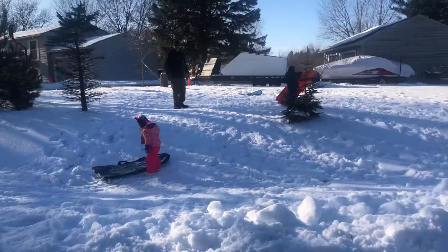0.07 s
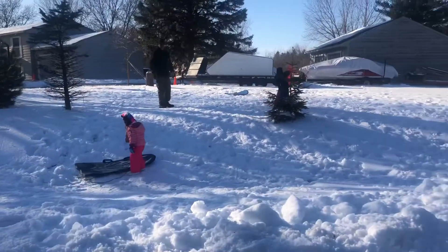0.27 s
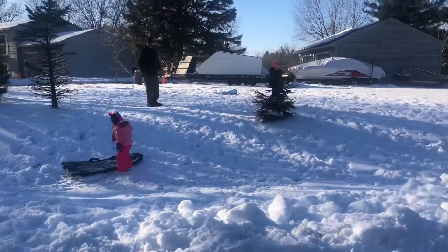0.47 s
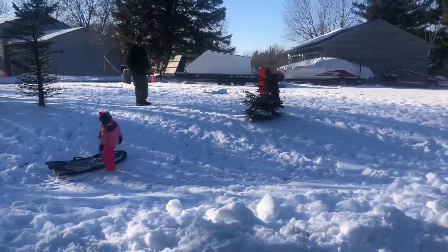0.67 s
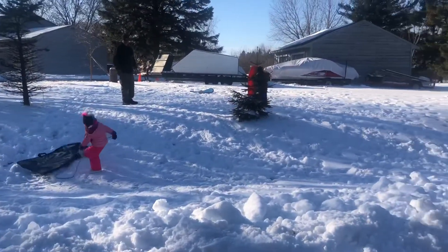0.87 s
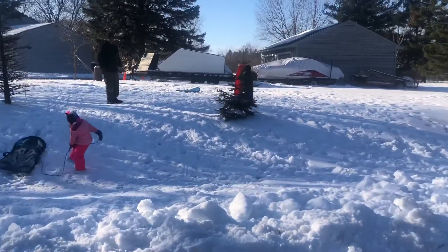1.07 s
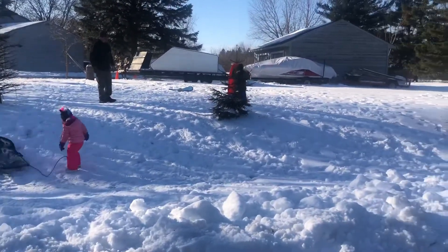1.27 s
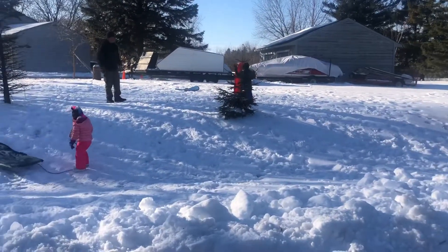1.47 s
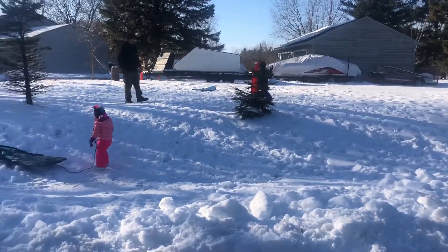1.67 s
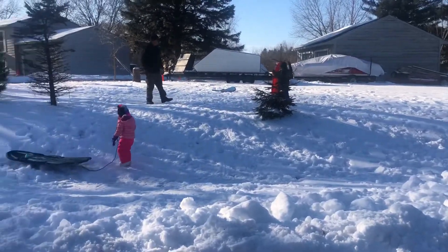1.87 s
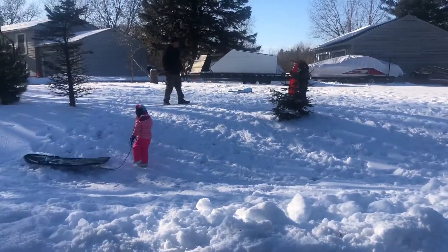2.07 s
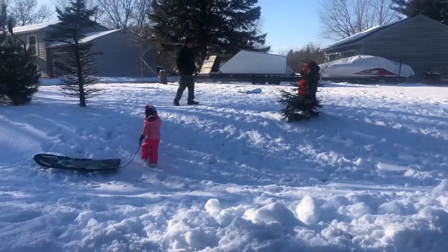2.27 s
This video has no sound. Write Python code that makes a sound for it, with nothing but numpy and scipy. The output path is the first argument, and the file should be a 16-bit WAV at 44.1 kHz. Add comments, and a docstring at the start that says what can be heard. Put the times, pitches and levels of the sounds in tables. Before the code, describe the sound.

Packed snow crunches and scrapes under a dragged plastic sled as low wind buffets the microphone.

```python
"""Snow crunches, cracks and scrapes as a plastic sled is dragged over it in the open.
The packed crust crunches in short bursts of tiny snapping crystals, single lumps crack with a
squeak, and the sled's hull scrapes on in between. Swirls of wind rumble and thump on a phone
microphone, over a faint outdoor hiss."""
import sys
import numpy as np
from scipy import signal
from scipy.fft import rfft, irfft, next_fast_len
from scipy.io import wavfile
from scipy.ndimage import uniform_filter1d

SR = 44100
rng = np.random.default_rng(int(sys.argv[2]) if len(sys.argv) > 2 else 0)


def master(y):
    """Save y as 16-bit WAV."""
    cut = np.clip(np.atleast_2d(y).T, -1, 1)
    pcm = np.round(cut * 32767)  # scale
    wavfile.write(sys.argv[1], SR, pcm.astype(np.int16))


N = 102841
T = np.arange(N) / SR

# Tone of the crust: f/Hz, level/dB
CRUST_TONE = [(350, 34), (600, 18), (1180, 9.5), (1420, 8.5), (2640, 4.5), (3700, 2), (5180, -1),
              (6000, 0.5), (15000, -17)]
# Bursts of crunching: t/s, length/s, then one level/dB for each band in bands_hz
CRUNCHES = [(.008, 0.0076, -50, -68, -64, -45), (0.078, 0.024, -55, -47, -59, -53),
            (0.102, 0.048, -65, -51, -58.5, -59.5), (0.227, 0.017, -85, -47.5, -66, -47),
            (0.538, 0.006, -51, -61, -55, -63), (0.552, 0.015, -64, -53, -49, -59),
            (.565, 0.0083, -50, -41, -49, -52), (0.577, 0.022, -53, -32.5, -42.5, -47),
            (0.611, 0.059, -62.5, -53.5, -56.5, -77), (0.697, 0.037, -61, -59, -52.5, -66),
            (0.804, 0.012, -40.5, -42.5, -48, -56), (0.972, 0.027, -49, -40.5, -51, -52.5),
            (1.098, 0.022, -53.5, -46.5, -56.5, -67), (1.137, 0.025, -50, -47, -56, -57),
            (1.171, 0.016, -47.5, -45.5, -50, -71), (1.198, 0.011, -60, -61, -61, -66),
            (1.228, 0.019, -50, -46.5, -40.5, -50.5), (1.336, 0.045, -46.5, -46, -50, -57.5),
            (1.366, 0.0048, -55, -49, -59, -43), (1.389, 0.0086, -54, -70, -50, -69),
            (1.417, 0.021, -48, -49, -51.5, -59), (1.47, 0.0078, -49, -77, -47.5, -68),
            (1.526, 0.024, -50.5, -71, -67.5, -76), (1.678, 0.098, -50.5, -80, -70, -69),
            (1.792, 0.063, -52.5, -52, -57.5, -70), (1.92, 0.028, -52.5, -55, -45.5, -61),
            (1.937, 0.045, -52, -60, -49.5, -55), (2.01, 0.024, -54, -55, -64, -67),
            (2.047, 0.012, -50.5, -76, -67, -72), (2.088, 0.0074, -44, -76, -56, -74),
            (2.111, 0.048, -80, -52, -61, -68), (2.156, 0.0076, -54, -55, -50, -75),
            (2.185, 0.005, -71, -52, -59, -81), (2.232, 0.0082, -61, -55, -63, -75),
            (2.315, 0.01, -42, -43, -40.5, -46.5)]
def crunches(attack_s=.001, release_s=.005):
    """The crust gives way in bursts of snapping crystals that start fast, hold and die away."""
    bands_hz = [(2200, 3900), (750, 2200), (3900, 9000), (9000, 17000)]
    crystals = grains(per_s=9000) * undb(1.5 * np.clip(wander(per_s=250), -2, 2))
    bands = [colour(crystals, CRUST_TONE, *edges) for edges in bands_hz]
    bands = [band * undb(2.2 * wander(per_s=250)) for band in bands]  # each flickers on its own
    out = np.zeros(N)
    for start, length, *levels_db in CRUNCHES:
        rise = np.clip((T - start) / attack_s, 0, 1)
        fade = np.exp(-np.maximum(T - start - length, 0) / release_s)
        out += rise * fade * sum(undb(db) * band for db, band in zip(levels_db, bands))
    return out


# Lumps that break: t/s, ring level/dB, ring f/Hz, click level/dB relative to the ring
CRACKS = [(0.0157, -34.5, 1730, -18), (0.111, -32, 1740, -13), (0.1228, -27.5, 1740, -7),
          (0.1358, -30.5, 1750, -16), (0.229, -26, 6230, 2.5), (0.2765, -44.5, 1360, 8),
          (0.538, -31.5, 4440, 0.5), (0.5861, -21, 1395, -9), (0.6301, -34.5, 4500, -4),
          (0.643, -35, 4200, -5), (0.6599, -44, 4200, 6), (0.7218, -34.5, 4400, -4),
          (0.7335, -50, 4500, -7), (0.8098, -17.5, 2580, -9.5), (0.834, -27, 2700, -10),
          (0.8474, -50, 2240, 1), (0.9218, -31.5, 2000, -8), (0.9973, -20.5, 2420, -24),
          (1.1417, -17, 2650, -13), (1.154, -22.5, 2500, -10), (1.3175, -32.5, 5200, -2),
          (1.3312, -32, 2600, -2), (1.3675, -29.5, 2740, 3), (1.391, -24, 3380, -8), (1.406, -30, 2920, -4),
          (1.4636, -29, 3160, -8), (1.483, -26, 3300, -16), (1.4716, -34, 2680, 1.5),
          (1.5013, -25.5, 2650, -9), (1.5385, -45, 2880, -2), (1.6197, -38.5, 1330, 2),
          (1.6415, -29.5, 2050, -8.5), (1.6726, -37, 2620, -7), (1.708, -34.5, 2600, -2),
          (1.7195, -45, 2600, -5), (1.7291, -41, 2470, 14), (1.7509, -34.5, 2570, 8.5),
          (1.8397, -32.5, 1980, -5), (1.905, -49, 3020, 6), (1.9335, -30, 2780, 5), (2.0074, -47, 5800, 5),
          (2.0902, -28, 3100, -14), (2.0988, -41, 2950, -8), (2.1595, -39, 2730, -2),
          (2.2129, -29.5, 2970, 1), (2.2452, -32.5, 2630, -8.5), (2.3006, -29, 2420, -5),
          (2.3134, -22.5, 2150, -8), (2.319, -22, 810, -27)]
def cracks(splinter_s=.0022, splinter_db=-7, click_rise_s=.0003, click_fade_s=.009):
    """A lump snaps with a bright click and a squeak, then splinters again, a little off pitch."""
    out, t = np.zeros(N + 2048), T[:1024]
    bright = signal.butter(2, [1000, 10500], "band", fs=SR, output="sos")
    clicks = signal.sosfilt(bright, rng.standard_normal((64, len(t))))
    clicks *= np.minimum(t / click_rise_s, 1) * 1000. ** (-t / click_fade_s)
    chances = rng.random((64, 2))
    for (start, db, hz, click_db), click, (wait, detune) in zip(CRACKS, clicks, chances):
        since_splinter = np.maximum(t - splinter_s * (1 + wait) / 2, 0)
        splinter = undb(splinter_db) * ring(since_splinter * hz * (.92 + .16 * detune))
        i = int(start * SR)
        out[i:i + len(t)] += undb(db) * (ring(t * hz) + splinter + undb(click_db) * click)
    return out[:N]


def ring(cycles, rise_cycles=1.3, fade_cycles=13):
    """A broken lump rings briefly: a tone that swells, then drops 60 dB over fade_cycles."""
    fade = 1000. ** (-np.maximum(cycles - rise_cycles, 0) / fade_cycles)
    return np.sin(2 * np.pi * cycles) * np.minimum(cycles / rise_cycles, 1) * fade


# Tone of the sliding hull: f/Hz, level/dB
SCRAPE_TONE = [(240, -10), (400, -7.5), (645, 8.5), (979, 4), (2020, 1.5), (2670, 3), (3640, 1), (4700, -2),
               (6500, -2.5), (8000, -10), (11900, -20), (16000, -52)]
# How loudly the hull scrapes: t/s, level/dB
SCRAPE_LEVELS = [(0.0, -47.5), (0.1, -57), (0.3, -56.5), (0.56, -59), (0.7, -48.5), (0.76, -48.5),
                 (0.93, -48.5), (1.05, -59), (1.15, -54), (1.2, -59.5), (1.3, -58), (1.45, -45),
                 (1.56, -54), (1.63, -50.5), (1.74, -50.5), (1.86, -57), (2.0, -52.5), (2.33, -51.5)]
def scrape(grit_per_s=55, grit_fade_s=.016):
    """The hull slides over uneven grains; bits of grit tick, and a powdery fizz follows along."""
    when, chance = rng.random((400, 2))[:int(grit_per_s * N / SR)].T
    ticks = np.zeros(N)
    ticks[(when * N).astype(int)] = undb(2 + np.minimum(-3.5 * np.log(chance + 1e-9), 7))
    grit = 1 + signal.lfilter([1], [1, -1000. ** (-1 / (grit_fade_s * SR))], ticks)
    rubbing = grains(per_s=6000) * undb(2 * wander(per_s=60)) * grit
    level_db = curve(SCRAPE_LEVELS, column=1)
    powder = colour(rng.standard_normal(N) * np.sqrt(grit), HISS_TONE, lo_hz=5300)
    powder_db = -64.5 + .82 * (level_db + 55.5)  # rises and falls a little less than the scrape
    return colour(rubbing, SCRAPE_TONE) * undb(level_db) + powder * undb(powder_db)


# Tone of the wind: f/Hz, level/dB
RUMBLE_TONE = [(20, -60), (33, -10), (64, 4.5), (92, 5), (191, -7.5), (293, -14), (546, -28.5),
               (675, -34.5), (892, -49), (1100, -92)]
# Gusts, before the microphone rounds them off: t/s, low rumble level/dB, upper rumble level/dB
GUSTS = [(0.0, -24.5, -40.5), (0.02, -37, -26), (0.05, -36.5, -43.5), (0.18, -24, -23.5),
         (0.23, -31.5, -31.5), (0.3, -26, -27), (0.37, -33, -48.5), (0.47, -35.5, -47),
         (0.52, -28.5, -42.5), (0.56, -33.5, -50), (0.6, -33, -28.5), (0.76, -26.5, -31.5),
         (0.78, -35, -22), (0.8, -34, -39), (0.84, -24, -30), (0.88, -27, -38), (0.92, -23, -28),
         (1.09, -30.5, -37), (1.17, -40, -21), (1.19, -40, -52), (1.21, -22.5, -46), (1.23, -20.5, -21),
         (1.265, -30, -51), (1.3, -57, -51), (1.36, -56, -45.5), (1.41, -35.5, -44), (1.52, -37, -48),
         (1.54, -50, -50), (1.62, -25, -38), (1.67, -41.5, -46.5), (1.69, -40, -43.5), (1.76, -30.5, -48),
         (1.89, -40.5, -50.5), (1.94, -29, -38), (2.03, -40, -50), (2.3, -50, -53.5), (2.33, -74, -39)]
def wind(split_hz=159, flutter_db=7, limit=.24):
    """Swirling air rumbles and thumps on the microphone, which rounds off the strongest swings."""
    flutter = undb(flutter_db * wander(per_s=77))
    noise = rng.standard_normal(N)
    low = even_out(colour(noise, RUMBLE_TONE, hi_hz=split_hz))
    upper = even_out(colour(noise * flutter, RUMBLE_TONE, lo_hz=split_hz))
    rumble = low * undb(curve(GUSTS, column=1)) + upper * undb(curve(GUSTS, column=2))
    return limit * np.tanh((rumble + thumps()) / limit)


# Thumps of wind, before the microphone rounds them off: t/s, level/dB, starting f/Hz
THUMPS = [(0.155, -26, 260), (0.17, -6, 196), (0.277, -19, 312), (.295, -7, 294), (0.521, -20, 257),
          (0.609, -14, 211), (0.666, -14, 247), (0.687, -10.5, 270), (0.763, -16.5, 360), (0.775, -15, 203),
          (0.827, -11.5, 373), (1.163, -16.5, 324), (1.22, -4, 248), (1.608, -16, 152)]
def thumps(fade_cycles=.63, sag=.19):
    """A swirl of air hits the microphone: a very short, low tone whose pitch sags."""
    out = np.zeros(N)
    for start, db, hz in THUMPS:
        cycles = np.maximum(T - start, 0) * hz
        slowing_cycles = np.log(1 + sag * cycles) / sag
        swell = np.minimum(cycles, 1) * np.exp(1 - np.maximum(cycles / fade_cycles, 1))
        out += undb(db) * np.sin(2 * np.pi * slowing_cycles) * swell
    return out


# Tone of the outdoor hiss (the powdery fizz uses its treble too): f/Hz, level/dB
HISS_TONE = [(433, -28), (656, -18), (1250, -15), (6300, -28.5), (14500, -30), (16000, -33.5)]
def hiss(level_db=-69):
    """The open air hisses faintly and steadily."""
    return colour(rng.standard_normal(N), HISS_TONE) * undb(level_db)


def grains(per_s, spread_db=2.5, ring_cycles=8, sizzle_db=-8):
    """Snow crystals snap at random, each ringing briefly at one of 32 pitches, over a fine sizzle."""
    when, pitch, chance = rng.random((40000, 3))[:int(per_s * N / SR)].T
    sizes = undb(spread_db * np.minimum(-np.log(chance + 1e-9), 3))
    snaps, rings = np.zeros((32, N)), np.zeros(N)
    snaps[(pitch * 32).astype(int), (when * N).astype(int)] = sizes
    for hz, row in zip(np.linspace(22, 125, 32) ** 2, snaps):
        decay, angle = np.exp(-2 * hz / SR / ring_cycles), 2 * np.pi * hz / SR
        feedback = [1, -2 * decay * np.cos(angle), decay ** 2]  # makes each snap ring
        rings += np.sqrt(hz) * signal.lfilter([0, decay * np.sin(angle)], feedback, row)
    return rings / rings.std() + undb(sizzle_db) * rng.standard_normal(N)


def even_out(x, window_s=.025, evenness=.6):
    """Flatten chance swells, so that the swirls of wind come in similar sizes."""
    power = uniform_filter1d(x ** 2, int(window_s * SR))
    y = x / (power + .039) ** (evenness / 2)
    return y / y.std()


def colour(x, tone, lo_hz=0, hi_hz=SR):
    """Shape a sound with a tone table, soften it outside the band and scale it to strength 1."""
    size = next_fast_len(N)
    f = np.arange(size // 2 + 1) * SR / size
    hz, db = np.array(tone).T
    gain = undb(np.interp(np.log(f + 1), np.log(hz), db, left=-80))
    band_cut = np.sqrt((1 + (lo_hz / (f + 1)) ** 8) * (1 + (f / hi_hz) ** 8))
    y = irfft(rfft(x, size) * gain / band_cut, size)[:N]
    return y / y.std()


def wander(per_s):
    """Glide between random values, per_s of them a second, with a typical size of 1."""
    hold = int(SR / per_s)
    steps = np.repeat(rng.standard_normal(N // 20), hold)[:N]
    smooth = uniform_filter1d(uniform_filter1d(steps, hold), hold)
    return smooth / smooth.std()


def curve(table, column):
    """Join a column's values with straight lines over time."""
    points = np.array(table)
    return np.interp(T, points[:, 0], points[:, column])


def undb(db):
    """Turn decibels into a number to multiply by."""
    return 10 ** (np.asarray(db) / 20)


def scene():
    """Sled, wind and hiss add up in one channel."""
    return (crunches() + cracks() + scrape() + wind() + hiss())[None]


def record(dry, top_hz=15950):
    """The phone dulls the highest treble and cuts off the very top."""
    dull = signal.sosfilt(signal.butter(1, 16000, fs=SR, output="sos"), dry)
    return signal.sosfilt(signal.ellip(10, .2, 70, top_hz, fs=SR, output="sos"), dull)


dry = scene()
out = record(dry)
master(out)
```